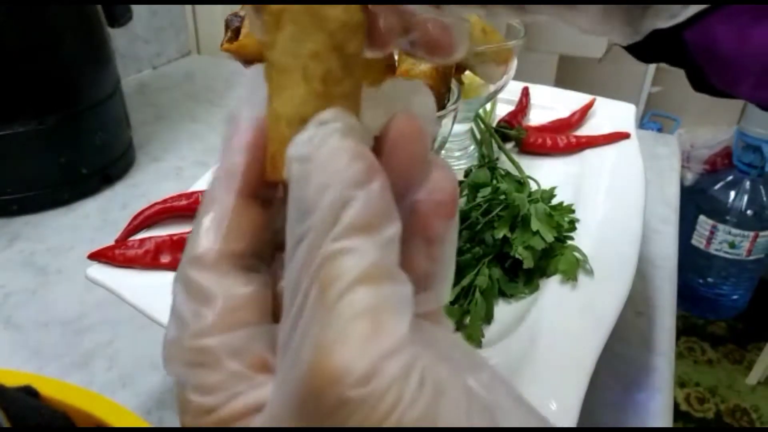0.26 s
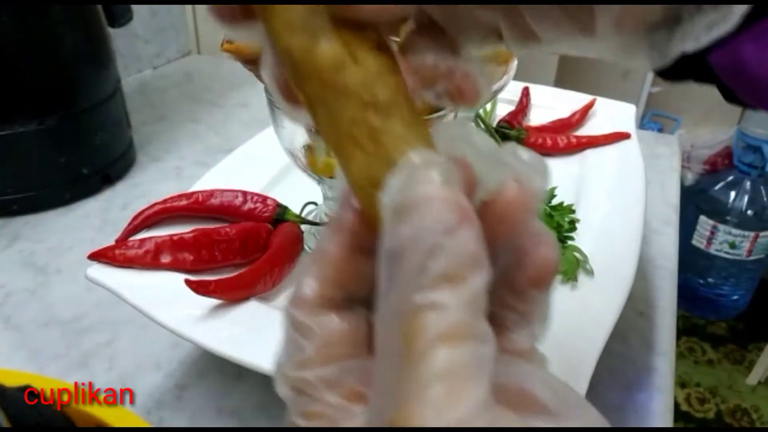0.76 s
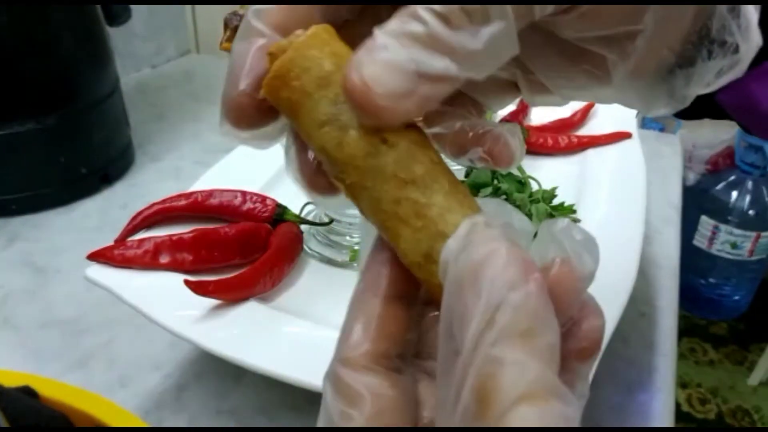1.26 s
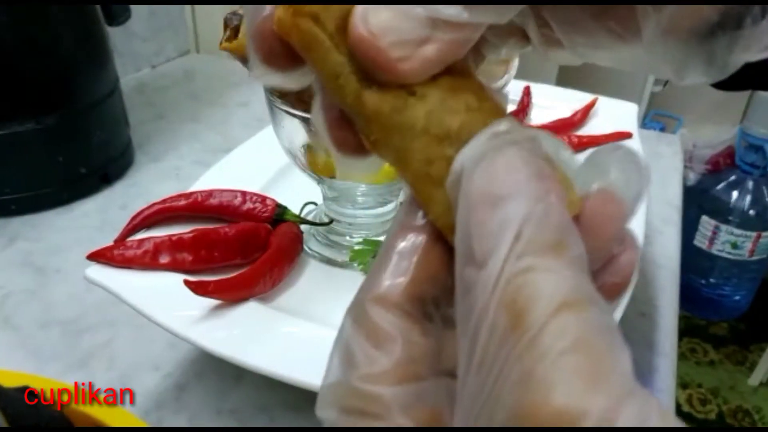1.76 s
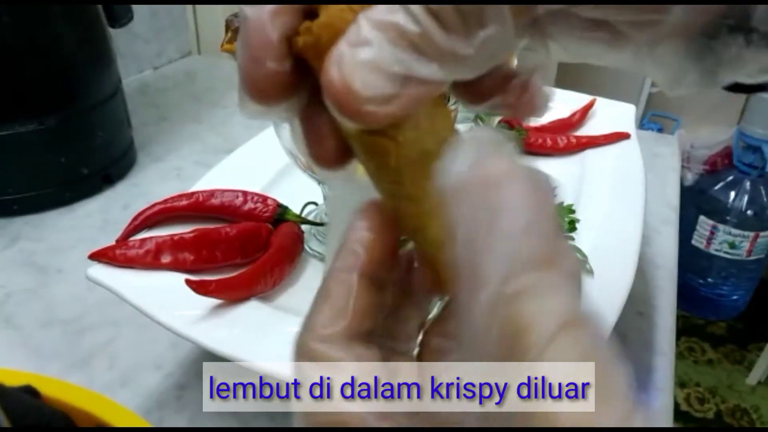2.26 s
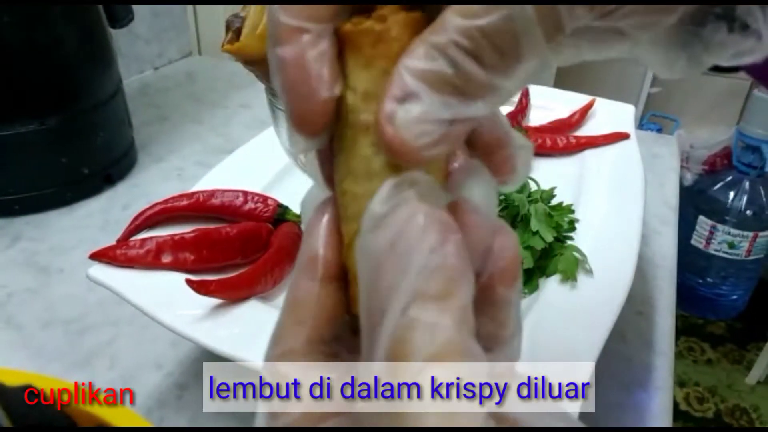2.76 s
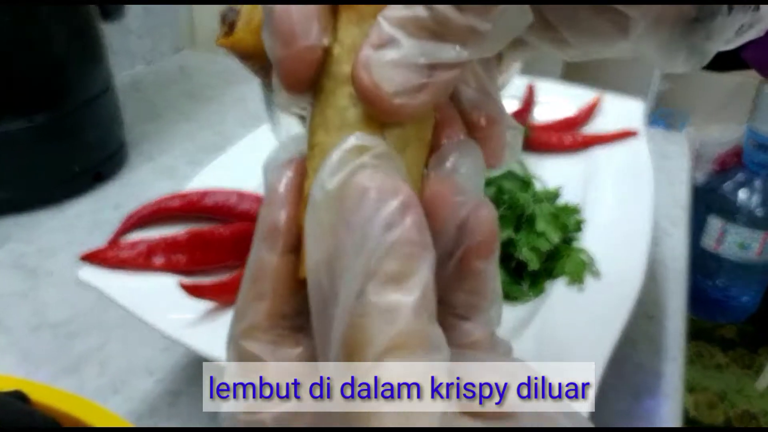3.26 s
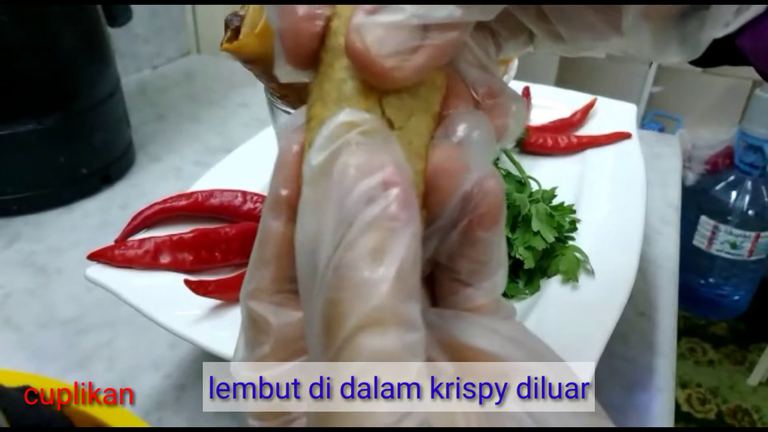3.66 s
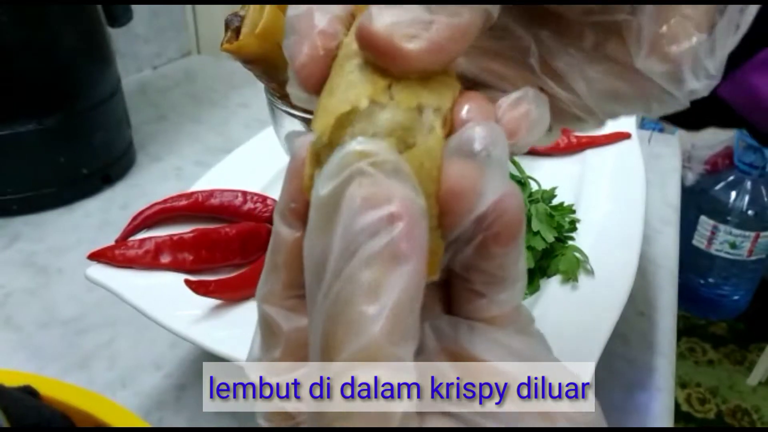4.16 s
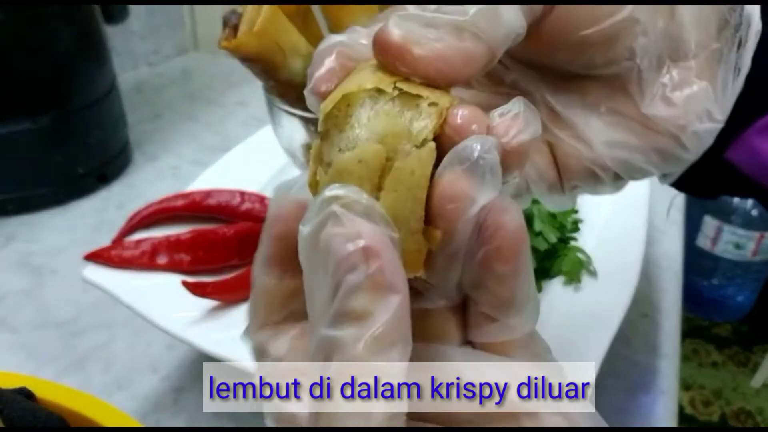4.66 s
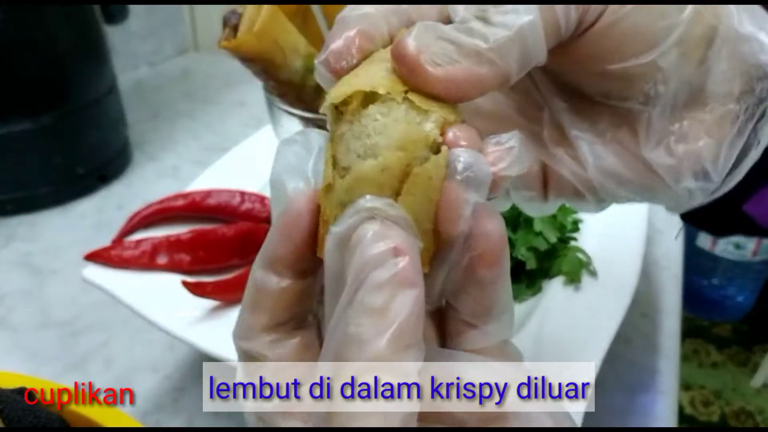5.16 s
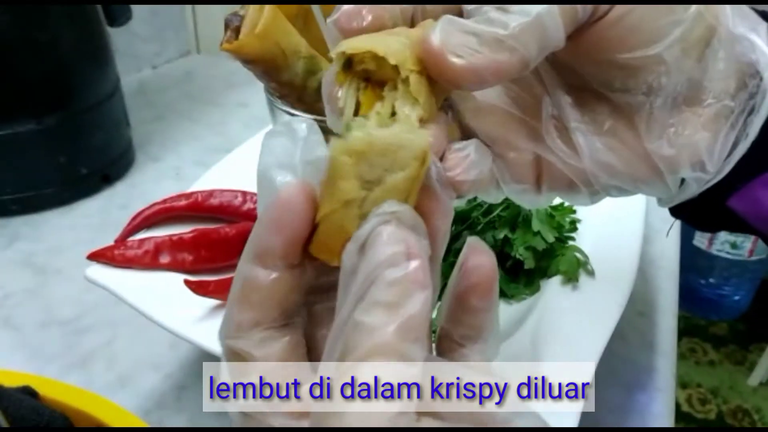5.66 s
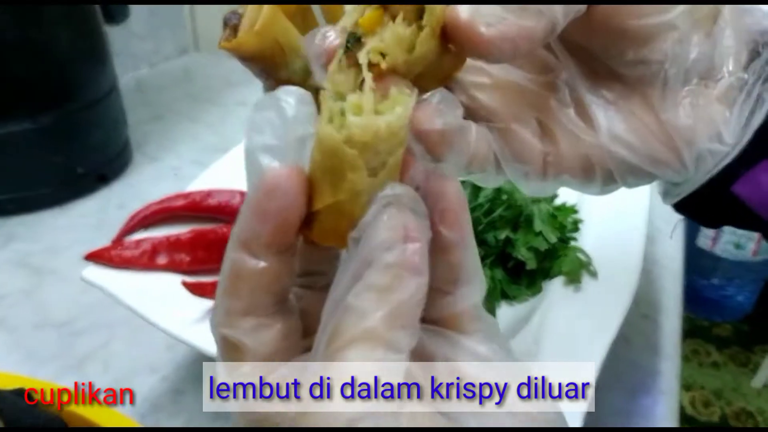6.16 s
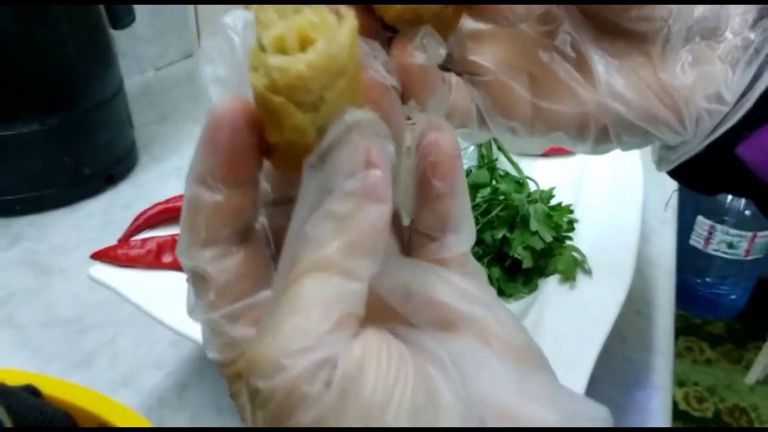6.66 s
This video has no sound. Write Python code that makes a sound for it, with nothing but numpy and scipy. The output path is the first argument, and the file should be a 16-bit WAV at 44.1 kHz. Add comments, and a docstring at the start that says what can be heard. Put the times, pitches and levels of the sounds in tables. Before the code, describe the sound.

Close, crisp crunching of a fried roll being cracked apart, followed by soft plastic glove rustles, with an appliance humming behind.

```python
"""A crisp crunch and plastic gloves

A close, crisp crunch is heard, like a bite into fried crust. The crust snaps and crackles, with a
mid-pitched and a low, hollow ring under it, both mouth-like. Thin plastic gloves crinkle and rub.
A brief pure tone swells at the first cracks, and a kitchen appliance hums and blows in the background."""
import sys
import numpy as np
from scipy import signal
from scipy.fft import rfft, irfft
from scipy.io import wavfile

SR = 44100
rng = np.random.default_rng(int(sys.argv[2]) if len(sys.argv) > 2 else 0)


def log_audio(samples):
    """Write samples as a 16-bit WAV file to the path given in sys.argv[1]."""
    # one column per channel
    frames = np.atleast_2d(samples).T
    # limit to full scale, then quantise
    limited = np.clip(frames, -1, 1)
    pcm = np.round(limited * 32767).astype(np.int16)
    wavfile.write(sys.argv[1], SR, pcm)


N = 304290

# The tone colour of breaking crust. Each row: frequency in Hz, gain in dB.
CRUST_SPECTRUM = [(880, -24.5), (1500, -10), (1630, -1.5), (2260, -7), (3310, -5), (4010, -10.5),
                  (5420, -3.5), (9220, -12.5), (12800, -12.5), (14800, -8.5), (15700, -17.5),
                  (16500, -35.5)]
# The tone colour of thin plastic. Each row: frequency in Hz, gain in dB.
GLOVE_SPECTRUM = [(1760, -53.5), (3000, -30.5), (4770, -20.5), (5580, -9.5), (6810, -5), (9260, -2),
                  (10800, -4.5), (13300, -16), (15400, -14), (16500, -33)]
# A low, hollow, mouth-like ring under each crunch. Each row: pitch in Hz, width in Hz, gain in dB.
HOLLOW_RINGS = [(399, 41, 2), (308, 230, -10)]
# The dull thump of a glove on pastry. Each row: pitch in Hz, width in Hz, gain in dB.
THUMP_RINGS = [(840, 1340, -4.5), (1630, 740, 0), (2390, 386, -1), (4250, 3700, -15)]


def cracks():
    """Each crack rings its own piece of crust and sizzles on top, over two mouth-like rings."""
    # Each row: start in seconds, level in dB, pitch of the piece in Hz, mid ring and hollow ring in dB
    # compared with the crust, fade time in seconds.
    snaps = [(1.979, -24, 5430, -32, -19, .03), (2.006, -31, 7800, -24, -15, 0.057),
             (2.034, -11, 6200, -23, -42, 0.012), (2.0674, -8, 6100, -12.5, -22.5, 0.041),
             (2.1012, -8, 4750, -19, -27, 0.016), (2.115, -15, 6000, -19, -39, 0.013),
             (2.1327, -9, 6230, -25, -52, 0.012), (2.1627, -11.5, 6140, -21, -36, 0.035),
             (2.175, -14, 6300, -23, -40, 0.016), (2.2058, -4.5, 6370, -21, -36, .013),
             (2.2216, -3.5, 6260, -22, -36, 0.016), (2.2493, -9, 2270, 2.7, -4, 0.036),
             (2.2543, -6, 6200, -4, -28, 0.071), (2.287, -15, 6300, -29, -35, 0.053),
             (2.3163, -18.5, 6100, -13, -44, 0.058), (2.348, -6.5, 4870, -0.5, -6, 0.02),
             (2.376, -24.5, 5800, 7, -20, 0.031), (2.3915, -13, 5300, -2, -15, .03),
             (2.456, -2.5, 5800, -27, -48, .014), (2.4613, -12.5, 6150, -12.5, -43, 0.2),
             (2.481, -8.5, 5270, -12, -43, 0.028), (2.492, -8.5, 5740, -13, -25.5, .029),
             (2.5485, -16.5, 5370, -40, -36, 0.013), (2.5664, -13, 6570, -46, -46, .014),
             (2.578, -16, 5600, -14.5, -38, 0.068), (2.6361, -0.8, 3410, -10, -18, 0.036),
             (2.653, -14.5, 5100, -4, -27, 0.14), (2.671, -8, 3100, -10, -16, 0.0085),
             (2.724, -21.5, 5650, -4, -14, 0.043), (2.7387, -20, 5260, -20, -19, 0.02),
             (2.796, -18.5, 5700, -20, -32, 0.083), (2.821, -13.5, 2180, -17, -28, 0.028),
             (2.83, -18, 7550, -23, -34, 0.067), (2.839, -16, 7500, -20, -39, 0.062),
             (2.853, -18, 2100, -27, -34, .012), (2.883, -21, 2170, -11, -37, .05),
             (2.9453, -19, 7800, -30, -36, .026), (2.962, -11, 5500, -8.5, -18.5, 0.041),
             (2.9682, -4.5, 5060, -16, -15.5, 0.03), (2.9874, -21, 5150, -11, -18, 0.033),
             (2.9976, -3.5, 5570, -13.5, -14, 0.051), (3.015, -8.5, 5700, -10, -35, .025),
             (3.0465, -9.5, 5350, -18, -21, 0.03), (3.074, -7.5, 3270, 1, -17, 0.021),
             (3.0995, -10.5, 3150, 6.5, -5.5, 0.0051), (3.1049, -12.5, 2830, -30, -3, 0.045),
             (3.126, -18.5, 6200, -11, -8, .039), (3.162, -13, 3100, -12, -13.5, 0.13),
             (3.201, -18, 2260, 11, -8.5, 0.019), (3.2104, -13, 2140, 7.5, -3.5, 0.013),
             (3.2229, -2, 5230, -8, -47, 0.014), (3.2538, -6.5, 3710, -5, -15, 0.016),
             (3.2622, -6.5, 3620, -4.5, -16.5, 0.02), (3.3236, -14.5, 3180, 0, -8, 0.21),
             (3.343, -10, 2890, 3.5, 2.2, .027), (3.35, -10.5, 2900, 7.5, -2, 0.027),
             (3.355, -13.5, 3290, 5, 1.5, 0.079), (3.3917, -16, 3620, 11, -2.5, 0.04),
             (3.4336, -11.5, 2150, 1, -10, 0.16), (3.468, -24, 2270, -7, -9, 0.048),
             (3.4963, -22, 3380, 4, 3.5, 0.038), (3.518, -25.5, 7140, 10.5, 5.5, 0.0066),
             (3.5357, -18.5, 7850, -14, -13, 0.0095), (3.5686, -20, 2160, 1.8, -4.5, 0.038),
             (3.6904, -21.5, 6130, -8, -31, 0.025), (3.757, -6, 2290, -29, -44, 0.016),
             (3.828, -40, 7460, -21, -27, .03), (3.8338, -9, 5180, -2.5, -13.5, 0.016),
             (3.844, -8, 3570, -1, -14.5, 0.031), (3.8503, -9, 3030, -6, -7.5, 0.029),
             (3.867, -24.5, 7100, -6, -7, 0.021), (3.902, -21.5, 2230, -10, -17, 0.059),
             (3.9275, -30, 7550, -9, -27, 0.036), (3.9513, -23, 7500, -16, -29, 0.0055),
             (3.9859, -12, 4920, -6, -37, 0.033), (3.9974, -16, 7300, -5.5, -25, 0.018),
             (4.038, -23, 2960, -4.5, -13, 0.058), (4.0951, -36, 7400, -20.5, -24, 0.027),
             (4.128, -57, 8300, -30, -25, .012), (4.173, -56, 7800, -31, -11, .03),
             (4.219, -20.5, 3010, 0.5, 3.5, .12), (4.2348, -19.5, 2290, 5, -3.5, 0.048),
             (4.2631, -22.5, 2410, -5, -19, .018)]
    out = np.zeros(N)
    noise = rng.standard_normal((len(snaps), 3, 6000))
    jerks_db = 4.0 * rng.standard_normal((len(snaps), 1, 150))
    noise *= amp(np.repeat(jerks_db, 40, axis=2))  # a break runs in jerks of about a millisecond
    overtones = rng.uniform(-0.67, .9, (len(snaps), 3))  # each piece's other rings, in octaves from it
    for snap, (crust_noise, mid_noise, hollow_noise), octaves in zip(snaps, noise, overtones):
        start, level_db, hz, mid_db, hollow_db, t60 = snap
        rise_s = .03 * t60
        fracture = colour(burst(crust_noise, t60, rise_s, kick=1.0), CRUST_SPECTRUM)
        rings = [(hz, 0.049 * hz, 11.0)] + [(hz * 2 ** octave, 250, 11.0) for octave in octaves]
        piece = fracture + resonate(fracture, rings)
        piece = pass_band(piece, "high", 0.38 * hz, order=2)  # a small piece gives off little bass
        # High-pitched pieces and soft cracks have a larger share of sizzle.
        sizzle_db = -5.5 + 9.5 * np.log2(hz / 5000) + 0.54 * (-12 - level_db)
        sizzle = amp(sizzle_db) * peak_one(pass_band(fracture, "high", hz=8000))
        crust = peak_one(pass_band(piece, "low", hz=8000)) + sizzle
        age = np.maximum(np.arange(len(mid_noise)) / SR - rise_s, 0)
        fade = amp(-12.0 * age / t60)  # the mid ring dies quickly with each crack
        mid = peak_one(fade * mid_ring(burst(mid_noise, t60, rise_s, kick=2.7)))
        hollow = peak_one(resonate(burst(hollow_noise, 0.86 * t60, rise_s), HOLLOW_RINGS))
        add(out, start, amp(level_db) * (crust + amp(mid_db) * mid + amp(hollow_db) * hollow))
    return out


def crackle():
    """Crushed crust makes countless tiny breaks: crumbs ring high, flakes lower, over mouth-like rings."""
    # Each row: start in seconds, length in seconds, crumb level in dB, then flake level and mouth-like
    # ring level in dB compared with the crumbs.
    crunches = [(1.969, 1.7, -46, -9.5, -18), (1.958, 0.13, -33.5, -21, -22), (2.072, 0.13, -27, -11, -12),
                (2.205, 0.25, -26, -1.5, -11.5), (2.444, 0.085, -35, 1, 1), (2.536, 0.19, -36, -15, -12.5),
                (2.642, 0.14, -34, -5.5, -5), (2.801, 0.065, -32, -18, -20), (2.866, 0.12, -35, -25, -11.5),
                (2.95, 0.13, -35.5, 6.5, 6.5), (3.104, .22, -35.5, 2.5, 11), (3.31, 0.261, -33, -1, 10.5),
                (3.593, 0.11, -52, -26, -8), (3.678, 0.21, -52, -12, 4), (3.826, .12, -47.5, 9.5, 13),
                (3.986, .11, -46, -3, 7.5), (4.076, 0.23, -64, -8, 2), (4.227, .18, -52, 1.5, 6.5)]
    starts, lengths, crumb_db, flake_db, ring_db = np.transpose(crunches)
    crumb_gain, flake_gain, ring_gain = (
        strokes(starts, lengths, crumb_db + offset_db, attack_s=0.018, sag_db=8, release_s=.02)
        for offset_db in (0, flake_db, ring_db))
    push = grains(per_s=1000, spread_db=0.5, bed=0.85)
    pieces = ringing_pieces(push, pitches=np.geomspace(1700, 13000, 24), cycles=10.0)
    crust = colour(rms_one(pieces) + 1.8 * push, CRUST_SPECTRUM)
    flakes, crumbs = (rms_one(pass_band(crust, kind, hz=4200)) for kind in ("low", "high"))
    ring = rms_one(mid_ring(push)) + amp(-11.5) * rms_one(resonate(push, HOLLOW_RINGS))
    return crumb_gain * crumbs + flake_gain * flakes + ring_gain * ring


def ringing_pieces(push, pitches, cycles):
    """Every few milliseconds another piece breaks and rings briefly at its own pitch."""
    chosen = np.repeat(rng.integers(0, len(pitches), N // 128 + 1), 128)[:N]
    return sum(np.sqrt(cycles) * resonate(push * (chosen == k) + 1e-18, [(hz, hz / cycles, 0)])
               for k, hz in enumerate(pitches))


def mid_ring(push):
    """The crunch has a mid-pitched, mouth-like ring with little sound below its lowest pitch."""
    # Each row: pitch in Hz, width in Hz, gain in dB.
    mid_pitches = [(935, 78, 3), (978, 74, 4.5), (1127, 88.5, 4.5), (1318, 150, -1), (1510, 110, -6),
                   (1770, 42, -6)]
    return pass_band(resonate(push, mid_pitches), "high", hz=860, order=3)


def crinkles():
    """Creases in the thin gloves pop over: very short bright ticks, some with a dull thump."""
    # Each row: start in seconds, level in dB, thump in dB compared with the tick,
    # the tick's lean to the left in dB.
    creases = [(1.6826, -19.5, -2, -11), (1.7043, -16, 5.5, -4), (1.7134, -20.5, -3, -4),
               (1.723, -21.5, -4, -4), (1.7347, -23, -2, 0), (1.7383, -18, -4, -2), (1.7439, -13.5, -2, -1),
               (1.7498, -9.5, 1.5, -4), (1.757, -10, -9, 2.2), (1.766, -14, -9, -5), (1.791, -22, -9, -8),
               (1.8134, -14.5, -4, -12), (1.8166, -17, -4.5, -6), (1.8355, -18, -30, -8),
               (1.851, -23, -27, -18), (1.857, -34, -19, 4), (1.877, -11.5, -0.9, -6),
               (1.892, -24, -15, -5), (1.9146, -24, -18, -5), (1.9181, -18.5, -16, -3),
               (3.507, -21, -25, -2), (3.526, -22, -26, 2), (4.364, -30, -36, -6),
               (4.4068, -32.5, -33.5, -10.5), (4.6817, -26, -17, -3.5), (4.927, -42, -16, 15),
               (5.007, -29, -17.5, 3.5), (5.0413, -33, -27, 7.5), (5.063, -31, -27, -1.1),
               (5.1084, -35, -21, 1), (5.117, -26.5, -20, -3), (5.125, -27, -15, 4),
               (5.1407, -25, -10.5, -5), (5.1826, -23, -32, -6), (5.1864, -16.5, -24, -3),
               (5.1968, -15, -21, 3), (5.221, -28, -28, 4.5), (5.255, -26, -31, 1), (5.2797, -34, -31, -3),
               (5.3076, -39, -16.5, -5), (5.382, -51, -21, 0), (5.429, -54, -20.5, 0.5)]
    out = np.zeros((2, N))
    noise = rng.standard_normal((len(creases), 2, 2000))
    for (start, level_db, thump_db, pan_db), (tick_noise, thump_noise) in zip(creases, noise):
        pop = burst(tick_noise, t60=0.0068, rise_s=0.0003, tail_db=-9.5, tail_t60=0.045, kick=0.96)
        tick = peak_one(colour(pop, GLOVE_SPECTRUM)) * amp([[pan_db / 2], [-pan_db / 2]])
        bump = burst(thump_noise, t60=0.0079, rise_s=0.00088, tail_db=-12.5, tail_t60=0.31)
        thump = peak_one(resonate(bump, THUMP_RINGS))
        add(out, start, amp(level_db) * (tick + amp(thump_db) * thump))
    return out


def rustle():
    """Plastic slides on plastic: dense faint ticks, a little different in the left and right channels."""
    # Each row: start in seconds, length in seconds, level in dB.
    rubs = [(0, 0.071, -60.5), (0.416, 0.034, -66), (1.526, 0.065, -67.5), (1.646, 0.057, -52),
            (1.675, 0.27, -35), (1.908, 0.079, -45.5), (3.48, 0.2, -43), (4.287, 0.23, -53.5),
            (4.623, 0.076, -67), (4.668, .11, -55.5), (4.915, 0.1, -60.5), (4.99, 0.22, -51.5),
            (5.168, .175, -46.5), (5.563, 0.058, -71), (6.154, 0.089, -61), (6.328, 0.074, -68)]
    gain = strokes(*np.transpose(rubs), attack_s=0.014, sag_db=6, release_s=0.039)
    push = grains(per_s=428, spread_db=3.0, bed=0.88) + 0.55 * rng.standard_normal((2, N))
    plastic = rms_one(colour(push, GLOVE_SPECTRUM))
    thumps = rms_one(resonate(push, THUMP_RINGS))
    return gain * (plastic + amp(-14.5) * thumps)


def off_to_right(stereo):
    """The gloves are to the right: the microphone's far opening hears them dulled, except where it rings."""
    # Each row: frequency in Hz, left gain minus right gain in dB.
    balance = [(250, -17), (700, -28.5), (1300, -23.5), (3000, -10), (5500, 3.5), (7500, 13), (9300, -5.5),
               (11000, -22), (15000, -6.5)]
    return np.array([colour(channel, [(hz, sign * db / 2) for hz, db in balance])
                     for channel, sign in zip(stereo, (1, -1))])


def pure_tone():
    """A brief, clean tone swells and fades."""
    # Each row: time in seconds, pitch in Hz, level in dB.
    swell = [(1.9, 574, -58), (2.012, 572.2, -24), (2.17, 571, -61)]
    times, *columns = np.transpose(swell)
    t = np.arange(N) / SR
    hz, level_db = (np.interp(t, times, column, left=-150, right=-150) for column in columns)
    return np.sqrt(2) * amp(level_db) * np.sin(2 * np.pi * np.cumsum(hz) / SR)


def counter_echoes(sound, t60, level_db):
    """Quick, scattered echoes come off the kitchen counter, different in each channel."""
    t = np.arange(SR // 5) / SR
    tail = rng.standard_normal((2, len(t))) * amp(-60 * t / t60) * (t > .001)
    tail /= np.sqrt(np.sum(tail ** 2) / 2)
    return amp(level_db) * signal.fftconvolve(sound[None], tail, axes=1)[:, :N]


def appliance_air():
    """The appliance blows: a low rush of air, alike in both channels only in the bass."""
    # Each row: frequency in Hz, gain in dB.
    air_spectrum = [(12, -42), (20, -8.5), (91, -9), (161, -4), (231, -9.5), (277, -11), (599, -12.5),
                    (718, -13), (786, -11.5), (1950, -20.5), (2330, -26), (3280, -49), (4500, -66.5),
                    (5850, -107.5), (9900, -120)]
    # Each row: frequency in Hz, how alike left and right are (1 is the same, -1 is opposite).
    likeness = [(60, 0.97), (180, 0.91), (550, 0.46), (1650, -0.11), (4970, -0.64), (15000, 0.27)]
    hz = np.fft.rfftfreq(N, 1 / SR) + 1
    mid, side = rfft(rng.standard_normal((2, N)))
    alike = at_hz(likeness, hz)
    stereo = np.sqrt(1 + alike) * mid + np.sqrt(1 - alike) * side * [[1], [-1]]
    return amp(-46) * rms_one(irfft(amp(at_hz(air_spectrum, hz)) * stereo, N))


def appliance_hum():
    """The appliance hums a few notes, each partly steady and partly wavering."""
    # Each row: pitch in Hz, width of the waver in Hz, level in dB.
    notes = [(59, 4, -61), (89.9, 4.1, -45.5), (113.5, 24, -49.5), (227.7, 6.3, -48.5), (711.5, 22, -58)]
    hum = 0
    for hz, width_hz, level_db in notes:
        ring = [(hz, width_hz, 0)]
        noise = rng.standard_normal(N + SR)
        waver = rms_one(resonate(resonate(noise, ring), ring)[SR:])
        sine = np.sqrt(2) * np.sin(2 * np.pi * (hz * np.arange(N) / SR + rng.random()))
        steady = min(.6, 150 / hz)  # less of a high note holds still
        hum += amp(level_db) * (steady * sine + (1 - steady) * waver)
    return hum


def burst(noise, t60, rise_s, tail_db=-17.5, tail_t60=0.22, kick=2.45):
    """A break runs through a sheet: noise builds to a sharp kick, dies fast and leaves a crumbling tail."""
    t = np.arange(len(noise)) / SR - rise_s
    fall = amp(-60 * t / t60) + amp(tail_db - 60 * t / tail_t60)  # a t60 is the seconds to fade by 60 dB
    push = noise * np.where(t < 0, (1 + t / rise_s) ** 2, fall * (1 - t / t[-1]))
    push[round(rise_s * SR)] += kick * np.sqrt(SR / 2000)
    return push


def grains(per_s, spread_db, bed):
    """Tiny random clicks of uneven size over a bed of noise."""
    sizes = amp(spread_db * np.minimum(rng.exponential(1, N), 4)) * rng.standard_normal(N)
    clicks = rms_one(sizes * (rng.random(N) < per_s / SR))
    return rms_one(clicks + bed * rng.standard_normal(N))


def strokes(starts, lengths, levels_db, attack_s, sag_db, release_s):
    """The loudness of separate movements over time: each swells, sags while it lasts and lets go."""
    t, gain = np.arange(N) / SR, np.zeros(N)
    for start, length, level_db in zip(starts, lengths, levels_db):
        span = slice(int(start * SR), int((start + length) * SR))
        age = t[span] - start
        edge = np.clip(np.minimum(age / attack_s, (length - age) / release_s), 0, 1)
        gain[span] += edge ** 2 * amp(level_db - sag_db * age / length)
    return gain


def resonate(push, rings):
    """Rings at several pitches at once, every second one upside down; narrow rings last longer."""
    out = 0
    for k, (hz, width_hz, gain_db) in enumerate(rings):
        r = np.exp(-np.pi * width_hz / SR)
        feed = [(1 - r * r) / 2, 0, (r * r - 1) / 2]
        feedback = [1, -2 * r * np.cos(2 * np.pi * hz / SR), r * r]
        out += (-1) ** k * amp(gain_db) * signal.lfilter(feed, feedback, push)
    return out


def colour(x, spectrum):
    """Gives a sound a tone colour without smearing it earlier in time."""
    hz = np.linspace(0, SR / 2, 257)
    power = amp(2 * at_hz(spectrum, hz + 1)) + 1e-7  # minimum_phase takes the square root
    taps = signal.minimum_phase(signal.firwin2(511, hz, power, fs=SR))
    return signal.fftconvolve(x, taps[None] if x.ndim > 1 else taps, axes=-1)[..., :x.shape[-1]]


def pass_band(x, kind, hz, order=4):
    """Keeps the "low" or the "high" side of a frequency."""
    return signal.sosfilt(signal.butter(order, hz, kind, fs=SR, output="sos"), x)


def at_hz(points, hz):
    """Reads a curve between its listed frequencies."""
    frequencies, values = np.transpose(points)
    return np.interp(np.log(hz), np.log(frequencies), values)


def add(out, start_s, sound):
    """Mixes a short sound in at its moment."""
    i = round(start_s * SR)
    out[..., i:i + sound.shape[-1]] += sound


def amp(db):
    return 10 ** (np.asarray(db) / 20)


def rms_one(x):
    return x / np.sqrt(np.mean(x ** 2) + 1e-20)


def peak_one(x):
    return x / (np.abs(x).max() + 1e-12)


def scene():
    """The crunch and its echoes, the gloves, the tone and the appliance sound together."""
    crunch = cracks() + crackle()
    gloves = off_to_right(crinkles() + rustle())
    echoes = counter_echoes(crunch, t60=0.05, level_db=-41.5)
    return crunch + echoes + gloves + pure_tone() + appliance_air() + appliance_hum()


def record(dry):
    """Adds a faint soft hiss, flattens the loudest peaks and cuts the highest treble steeply."""
    ceiling, cutoff_hz = .82, 16790
    hiss = signal.lfilter([1], [1, -.55], rng.standard_normal(dry.shape))
    drive = (dry + amp(-83.5) * hiss) / ceiling
    flattened = ceiling * drive / (1 + drive ** 6) ** (1 / 6)
    return signal.sosfilt(signal.cheby2(12, 70, cutoff_hz, fs=SR, output="sos"), flattened)


dry = scene()
out = record(dry)
log_audio(out)
```